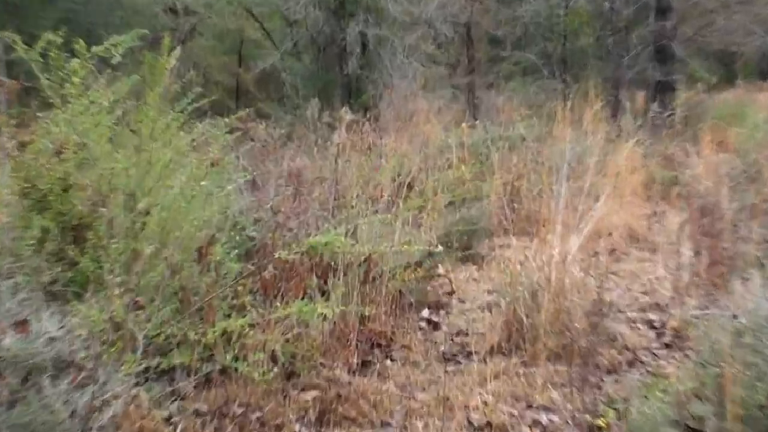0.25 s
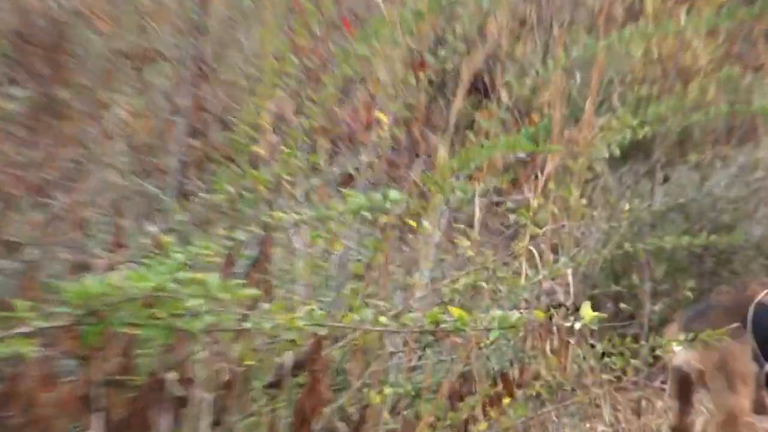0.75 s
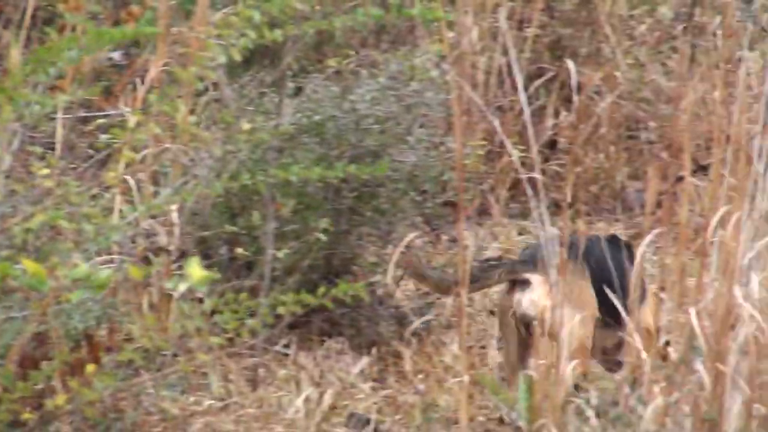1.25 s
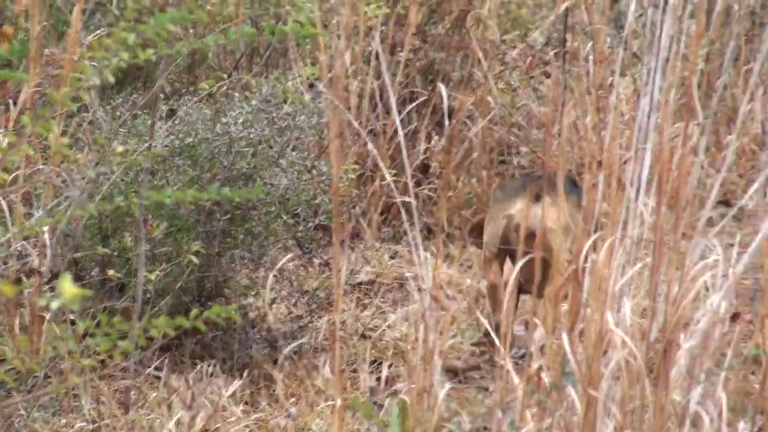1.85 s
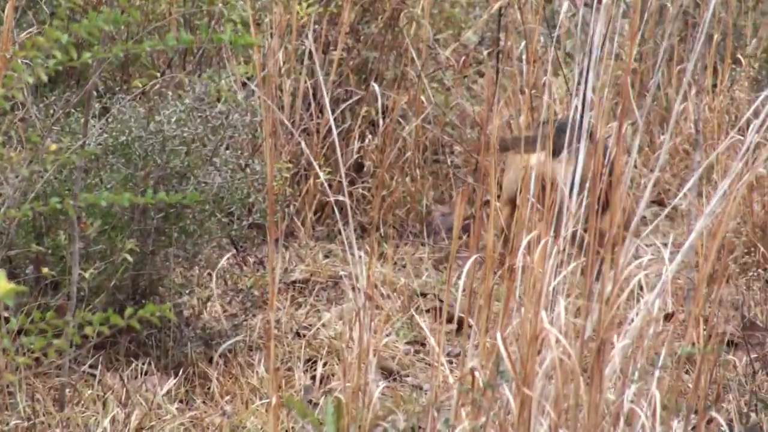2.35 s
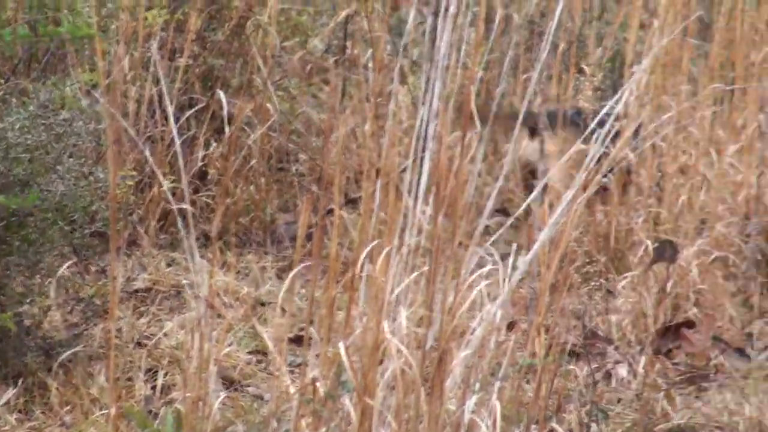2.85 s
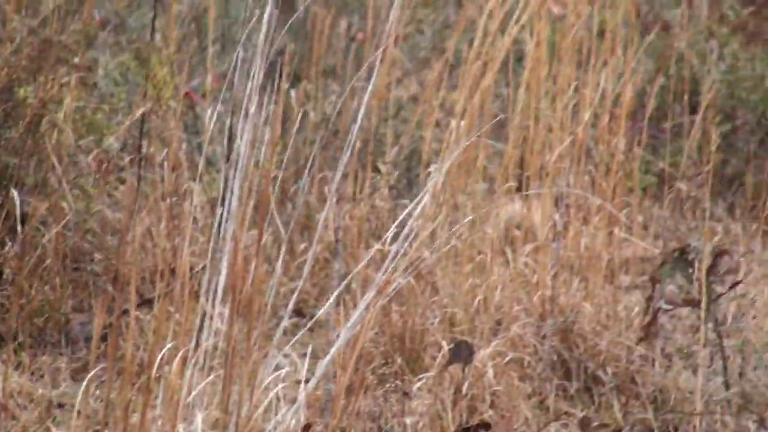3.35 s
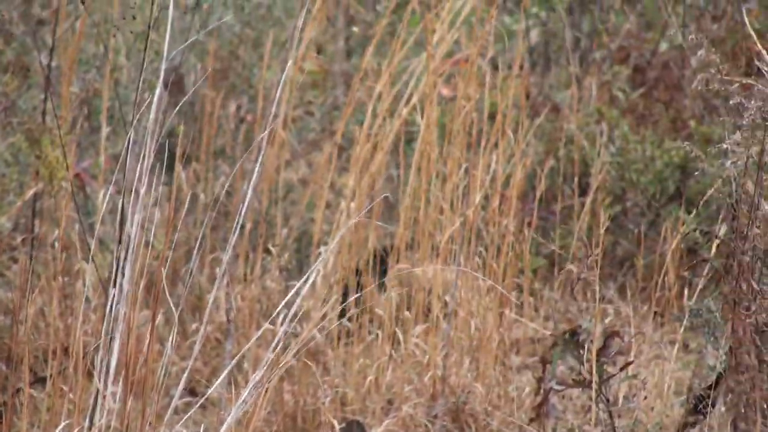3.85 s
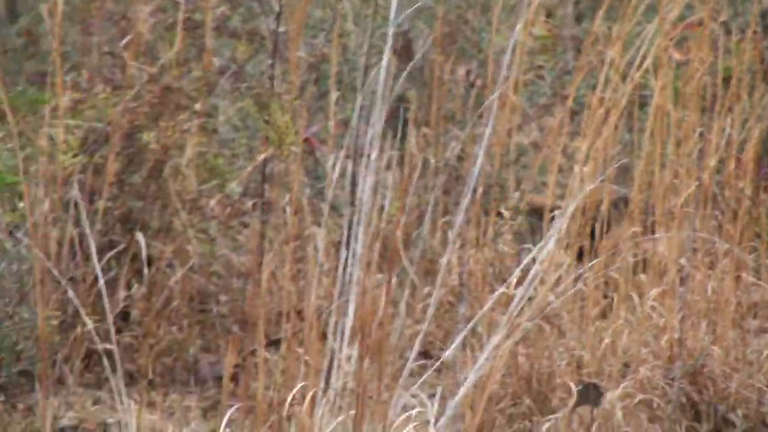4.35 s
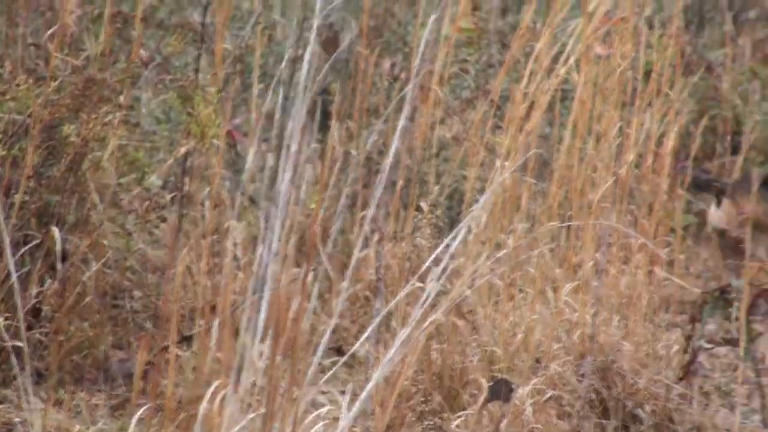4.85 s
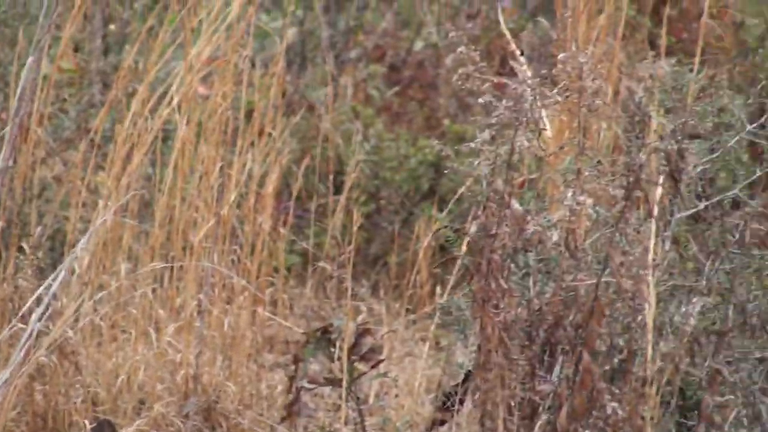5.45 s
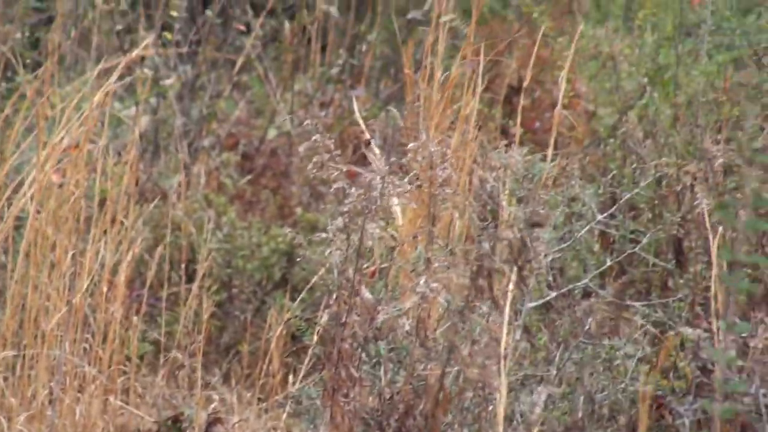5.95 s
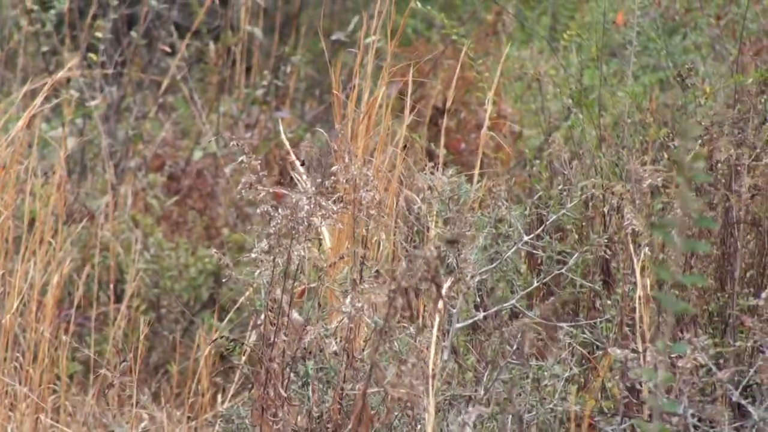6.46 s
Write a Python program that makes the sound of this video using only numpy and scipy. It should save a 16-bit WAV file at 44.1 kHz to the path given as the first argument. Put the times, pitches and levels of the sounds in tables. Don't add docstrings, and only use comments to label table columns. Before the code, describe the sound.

Outdoors in a brushy field by trees, a hound gives thirteen short, high, slightly cracked barks about twice a second, each leaping up in pitch and falling off. Woods echo the calls. A second dog yelps thinly far away, dry stems snap, and low wind rumbles on a handheld camera's stereo microphones over faintly rustling grass. Later barks are quieter as the dog moves away.

```python
import sys
import numpy as np
from scipy import signal
from scipy.fft import rfft, irfft, next_fast_len
from scipy.io import wavfile
from scipy.ndimage import uniform_filter1d

SR = 44100
rng = np.random.default_rng(int(sys.argv[2]) if len(sys.argv) > 2 else 0)


def file_out(sig):
    cols = np.atleast_2d(sig).T
    lim = np.clip(cols, -1, 1)
    pcm = np.round(lim * 32767).astype(np.int16)
    wavfile.write(sys.argv[1], SR, pcm)


def field_ratio(decibels):
    return 10 ** (np.asarray(decibels, dtype=float) / 20)


N = 295022
LEAD = SR // 2

SNAPS = [.834, 1.261, 1.815, 3.252, 3.702, 4.282, 6.275]


def band(x, hz, width):
    b, a = signal.iirpeak(hz, hz / width, fs=SR)
    return signal.lfilter(b, a, signal.lfilter(b, a, x))


def cut(x, hz, kind="low"):
    return signal.sosfilt(signal.cheby2(10, 50, hz, kind, fs=SR, output="sos"), x)


def unit(x):
    return x / np.sqrt(np.mean(x ** 2))


def chance(t, count):
    longest = SR // 4
    return rng.standard_normal((count, longest))[:, :len(t)]


def coloured(points):
    hz, db = np.transpose(points)
    size = next_fast_len(N)
    shape = np.interp(np.log(np.arange(size // 2 + 1) * SR / size + 1), np.log(hz), db)
    return unit(irfft(rfft(rng.standard_normal(size)) * field_ratio(shape), size)[:N])


def walk(rate):
    k = int(SR / rate)
    steps = np.repeat(rng.standard_normal(N // k + 1), k)
    return uniform_filter1d(uniform_filter1d(steps, k), k)[:N]


def add(track, sound, s):
    i = int(s * SR) + LEAD
    n = min(sound.shape[-1], track.shape[-1] - i)
    track[..., i:i + n] += sound[..., :n]


def field():
    # (frequency [Hz], density [dB per Hz])
    leaves = [(120, -58), (200, -15.5), (388, -15.5), (687, -5.5), (767, -12.5), (922, -14), (1170, -15),
              (2040, -22), (2230, -19), (2400, -24.5), (2630, -21), (3170, -27), (16300, -39)]
    level_db = -65
    mid, side = coloured(leaves), coloured(leaves)
    stir = field_ratio(level_db + 8.5 + .5 * walk(4.5) + 0.97 * walk(14))
    return stir * (mid + field_ratio(-4.0) * side * np.array([[1], [-1]]))


def wind(voice):
    # (time [s], level [dB])
    buffets = [(0.0, -44.5), (0.28, -50.5), (0.42, -47), (0.9, -53), (1.21, -59.5), (1.289, -48),
               (1.451, -48), (1.68, -34.5), (1.78, -50), (2.3, -53.5), (2.75, -52), (3.3, -55.5),
               (4.2, -57), (4.8, -52.5), (5.5, -52), (5.85, -76), (6.12, -51), (6.69, -62)]
    # (frequency [Hz], density [dB per Hz])
    rumble = [(8.8, -51.5), (15, -13.5), (37, 5.5), (60, 2.5), (82, 1.5), (157, -6), (289, -20),
              (348, -17.5), (450, -27.5), (580, -70), (990, -120)]
    rumble_lift_db, rumble_release_s = 11.5, 0.083

    late_voice = np.roll(np.abs(voice), int(.018 * SR))
    loud = np.clip(uniform_filter1d(late_voice, int(.03 * SR)) / .022, 0, 1)
    keep = np.exp(-1 / (rumble_release_s * SR))
    linger = np.maximum(loud, 0.94 * signal.lfilter([1 - keep], [1, -keep], loud))
    buffet_db = np.interp(np.arange(N) / SR, *np.transpose(buffets))
    gust = field_ratio(buffet_db + rumble_lift_db * linger + 1.5 * walk(6))
    side_db = -1.5 + 6.2 * loud
    mid, side = (coloured(rumble) * field_ratio(4. * walk(30)) for _ in range(2))
    ports = gust * (mid + field_ratio(side_db) * side * np.array([[1], [-1]]))
    return signal.lfilter(*signal.butter(1, 90, "high", fs=SR), ports)


def woods(x, tail_db, delay, echo_db, t60=1.1):
    t = np.arange(SR) / SR
    mid, side = rng.standard_normal((2, len(t))) * rng.exponential(size=len(t))
    tail = unit(np.exp(-np.log(1000) * t / t60) * np.clip(t / 0.11, 0, 1))
    echo = unit(np.exp(-((t - delay) / 0.0038) ** 2))
    brush = unit(np.exp(-t / 0.078))
    shape = field_ratio(-23) * brush + field_ratio(tail_db) * tail + field_ratio(echo_db) * echo
    shape = shape / np.sqrt(2 * len(t))
    dull = band(x, 720, 500) + field_ratio(-1) * band(x, 1250, 1600)
    return np.array([signal.fftconvolve(dull, shape * (mid + sign * .3 * side)) for sign in (1, -1)])


def far_dog():
    # (time [s], length [s], top pitch [Hz], level [dB], 3rd harmonic [dB])
    yelps = [
        (0.1, 0.11, 597, -55.5, -7.5),
        (0.728, 0.079, 556, -55, 3.5),
        (1.695, 0.047, 539, -54.5, -1),
        (2.039, 0.073, 538.4, -45, -13),
        (3.827, 0.056, 587, -64.5, 4),
    ]
    scoop_from_hz, scoop_under_hz = 489.33, 570
    out = np.zeros((2, N + LEAD))
    for s, length, top_hz, db, third_db in yelps:
        first_hz = scoop_from_hz if top_hz < scoop_under_hz else top_hz
        u = np.linspace(0, 1, int(length * SR))
        hz = top_hz * (1 - 0.082 * u ** 3) + (first_hz - top_hz) * np.exp(-u / 0.26)
        phase = 2 * np.pi * np.cumsum(hz) / SR
        upper = np.sin(3 * phase) + field_ratio(-4.5) * np.sin(4 * phase)
        stack = field_ratio(-3) * np.sin(phase) + np.sin(2 * phase) + field_ratio(third_db) * upper
        hoarse = field_ratio(3 * unit(band(chance(u, count=1)[0], 60, 100)))
        yelp = field_ratio(db) * np.sin(np.pi * u) * stack * hoarse
        add(out, yelp, s)
        add(out, woods(yelp, -11, 0.075, -16.5, t60=0.63), s)
    return out[:, LEAD:]


def twigs():
    # (time [s], snap level [dB], snap pitch [Hz], thud level [dB], thud pitch [Hz])
    stems = [(0.656, -51, 1550, -44, 507), (1.184, -53.5, 3830, -47.5, 700), (2.549, -56, 5200, -28, 307),
             (2.564, -54, 5300, -29, 339.1), (2.6, -59, 5400, -35, 301), (2.899, -57, 3997, -56, 600),
             (3, -60, 3340, -37, 600), (3.791, -55.5, 3741, -48.5, 600), (4.038, -69, 1720, -39.5, 750),
             (4.054, -67, 4130, -64, 700)]
    out, t = np.zeros(N + LEAD), np.arange(2000) / SR
    for s, snap_db, snap_hz, thud_db, thud_hz in stems:
        push = 3 * np.exp(-t / .0004) + np.exp(-t / .006) * rng.standard_normal(len(t))
        knock = band(push, thud_hz, 450) + field_ratio(-2) * band(push, 2.6 * thud_hz, 400)
        knock += field_ratio(-9) * band(push, 1720, 300) + field_ratio(-15) * band(push, 2600, 400)
        tick = band(rng.standard_normal(len(t)) * np.exp(-t / .005), snap_hz, 400)
        snap = field_ratio(snap_db) * tick / np.abs(tick).max()
        thud = field_ratio(thud_db + 1.5) * knock / np.abs(knock).max()
        add(out, snap + thud, s)
    return out[LEAD:]


def snapped(t, s):
    out = t.copy()
    for snap in SNAPS:
        if s[0] < snap < s[-1]:
            j = np.searchsorted(s, snap)
            inside = (t > s[j - 1]) & (t < s[j])
            lagging = s[j - 1] + 0.34 * (t - s[j - 1])
            out[inside] = np.where(t < snap, lagging, s[j])[inside]
    return uniform_filter1d(out, size=220)


def gesture(call, effort, throat):
    attack_s, crest_s, settle_s, last_hz = .005, .006, .015, 444.6
    start, rise, hold, peak_db, top_hz = call
    glide_db, settled_db, sag_db, gasp_db, fall_s = effort
    first_hz, lock_hz, pure_db, late_db, third_db = throat
    lock, fall = start + rise, start + rise + hold
    climb_hz, drop_hz = top_hz - lock_hz, top_hz - last_hz
    snaps = any(start < snap < lock for snap in SNAPS)
    climb, brass_db = (.25, -4) if snaps else (.45, .6 * pure_db)
    glide_hz = first_hz + climb * (lock_hz - first_hz)
    rows = [
        (start, first_hz, -34, -3, -14),
        (start + attack_s, first_hz, glide_db - 10.5, 0, -13),
        (start + .6 * rise, glide_hz, glide_db, brass_db, brass_db - 11.5),
        (lock - .002, lock_hz, 0, pure_db, pure_db - 17.5),
        (lock + crest_s, lock_hz + 0.28 * climb_hz, -.5, pure_db, pure_db - 18),
        (lock + settle_s, lock_hz + 0.37 * climb_hz, settled_db, .7 * pure_db + 0.14 * late_db, third_db - 3.5),
        (lock + .6 * hold, top_hz, .55 * settled_db + 0.5 * sag_db, late_db - 4.5, third_db),
        (fall, top_hz - 6, sag_db, late_db, third_db + 2.0),
        (fall + .48 * fall_s, top_hz - .28 * drop_hz, gasp_db, -17, -39),
        (fall + .78 * fall_s, top_hz - 0.73 * drop_hz, gasp_db - 2.5, -17, -38),
        (fall + fall_s, last_hz, gasp_db - 11, -13, -30)]
    return np.array(rows) + [0, 0, peak_db, 0, 0]


def breath(t, noise):
    # (frequency [Hz], width [Hz], level [dB])
    cavities = [(2420, 560, 2.5), (6460, 760, -6.5), (6800, 250, -13), (7800, 1600, -7),
                (10900, 4600, -9.5)]
    patches = field_ratio(3.2 * unit(band(chance(t, count=len(cavities)), 6, 10)))
    return sum(field_ratio(db) * patch * unit(band(noise, hz, width)) for (hz, width, db), patch in zip(cavities, patches))


def second_mode(t, hz, phase, noise, chaos):
    # (time [s], length [s], first pitch [Hz], level under the voice [dB], roughness [0-1])
    onsets = [(0.311, 0.046, 870.9, -11.5, 1.06), (0.349, 0.04, 1000, -11.5, 0),
              (0.417, 0.034, 1012, -9.5, 0.42), (0.855, 0.032, 1035, -13.5, 0),
              (0.867, 0.019, 965.5, -14.5, 0.8), (0.936, 0.024, 992, -6, 0.4),
              (1.257, 0.0093, 924, -11.5, 0.7), (1.293, 0.044, 962, -16, 0), (1.364, 0.025, 1020, -11, 0.7),
              (1.906, 0.011, 847, -4.5, 0.13), (2.37, 0.091, 886, -1, 0.28), (2.443, 0.027, 1010, -3, 0.22),
              (2.814, 0.029, 1021, -8.5, 0), (2.833, 0.032, 950, -6.5, 0.7),
              (3.278, 0.097, 945, -3.5, 0.48), (3.698, 0.019, 950, -19, 0.82),
              (3.721, 0.089, 920, -15, 0.2), (4.302, 0.042, 1032, -17.5, 0.17),
              (4.363, 0.02, 890, -13.5, 0.38), (4.903, 0.024, 1024, -6, 0.64),
              (5.261, 0.06, 1020, -16.5, 0.08), (5.28, 0.044, 887.7, -10.5, 0.63),
              (5.347, 0.02, 960, -13.5, 0.26), (5.878, 0.031, 873, -3.5, 0.5)]
    sag_hz_per_s, follows = 390, 1.5
    shake, mode = np.zeros((2, len(t)))
    begin, end = t[0], t[-1] + 1 / SR
    for start, length, first_hz, mode_db, rough in onsets:
        if not begin < start < end:
            continue
        u = np.clip((t - start) / length, 0, 1)
        swell = field_ratio(mode_db) * np.sin(np.pi * u) ** .7
        drop = np.minimum(hz / np.interp(start, t, hz), 1) ** follows
        mode_phase = 2 * np.pi * np.cumsum((first_hz - sag_hz_per_s * length * u) * drop) / SR
        rasp = unit(cut(band(noise, first_hz, 600), 2000))
        mode += swell * ((1 - rough) * np.sin(mode_phase) + rough * rasp)
        mode += swell * field_ratio(-31.5) * np.sin(mode_phase + phase)
        beat = .25 * np.sin(mode_phase - phase)
        jolts = 2.2 * np.tanh(unit(band(chaos, 75, 90)))
        shake += swell * ((1 - rough) * beat + rough * jolts)
    return shake, mode


def bark(rows, hiss_db):
    mouth_top_hz = 3090
    s, *columns = np.transpose(rows)
    t = np.arange(s[0], s[-1], 1 / SR)
    hz, _, second_db, third_db = (np.interp(snapped(t, s), s, c) for c in columns)
    db = np.interp(t, s, columns[1])
    noise = chance(t, count=4)
    jitter = 1 + .007 * unit(band(noise[0], 90, 200))
    phase = 2 * np.pi * np.cumsum(hz * jitter) / SR
    shake, mode = second_mode(t, hz, phase, noise[1], noise[2])

    voice = np.sin(phase) + field_ratio(second_db) * np.sin(2 * phase + 0.9)
    for k in range(3, 7):
        flutter = 1 + .45 * unit(band(chance(t, count=1)[0], 50, 90))
        harmonic_db = third_db * (1 + .2 * (k - 3)) - 7 * np.sqrt(k - 3)
        voice += field_ratio(harmonic_db) * flutter * np.sin(k * phase + 1.2 * k)
    voice += field_ratio(-30) * unit(cut(band(noise[0], 1150, 900), 2200))
    voice = cut(voice * (1 + shake) + mode, 389, "high")
    tone = cut(np.sqrt(2) * field_ratio(db) * voice, 1.25 * mouth_top_hz)

    hiss = field_ratio(hiss_db + 0.35 * db + 0.56 * db.max()) * breath(t, noise[3])
    edge = np.clip(np.minimum((t - s[0]) / 0.0014, (s[-1] - t) / 0.0045), 0, 1)
    return edge * (tone + hiss)


def hound():
    # (time [s], rise [s], hold [s], peak level [dB], top pitch [Hz])
    calls = [(0.289, .046, 0.076, -16, 662.5), (0.804, .036, .082, -14, 698.5),
             (1.237, .033, .088, -13.5, 708.2), (1.793, .029, 0.083, -12, 711),
             (2.32, .017, 0.11, -13, 677), (2.743, .027, .110, -17.5, 710.6),
             (3.225, .036, 0.085, -17, 673), (3.67, .039, 0.093, -18, 691), (4.253, .034, .096, -16, 676.7),
             (4.819, .023, 0.093, -25.5, 730.5), (5.209, .038, 0.087, -22, 697.8),
             (5.771, .022, 0.088, -26, 704.8), (6.255, .027, 0.083, -22.5, 724.4)]
    # (glide [dB], settled [dB], end of hold [dB], last gasp [dB], fall [s])
    efforts = [(-5.5, -1, -7, -4.5, .042), (-9.5, -4, -8, -14, .052), (-10.5, -3.5, -9.5, -10.5, 0.039),
               (-12, -4.5, -13, -13.5, 0.037), (-9.5, -3.5, -17, -18.5, .040), (-8.5, -2, -7.5, -6.5, .036),
               (-10.5, -4, -13, -11, 0.038), (-8, 0.5, -7.5, -7, 0.035), (-15, -5.5, -10.5, -9, 0.044),
               (-2, 0.5, -2.5, -8, 0.048), (-4, -2, -5.5, -5.5, 0.045), (-4.5, -3.5, -13, -19, 0.058),
               (-12, -3.5, -13, -13, .048)]
    # (first pitch [Hz], locked pitch [Hz], overtones at the lock [dB],
    # 2nd harmonic late in the hold [dB], 3rd harmonic in the hold [dB])
    throats = [(512, 660, -25.5, -5, -38), (547, 685, -22, -11, -52), (543.6, 675, -23.5, -6.5, -38),
               (552.3, 683, -20, -5, -34.5), (592.4, 638, -29, -9.5, -40.5), (516, 645, -18.5, -11, -36.5),
               (528, 672, -21, -12, -44), (551, 662, -26.5, -12.5, -46.5),
               (522.7, 696, -26.5, -16.5, -46.5), (570, 655, -11.5, -4, -26),
               (552.4, 690, -20, -15.5, -47.5), (582, 645, -37.5, 0.5, -24), (569.4, 685, -33, -14.5, -32)]
    # (breath hiss [dB], woods tail [dB], echo delay [s], echo level [dB])
    surroundings = [(-47.5, -31.5, 0.049, -46), (-49, -30.5, .2, -29), (-50, -28, 0.17, -55),
                    (-56.5, -33.5, 0.2076, -31.5), (-48.5, -29.5, 0.29, -37.5), (-49.5, -25, 0.198, -28.5),
                    (-49, -23, .2, -44), (-52, -23, 0.19, -32), (-49.5, -18, .135, -25),
                    (-49.5, -20, .2, -51), (-49.5, -18, 0.19, -33), (-46.5, -14.5, 0.14, -56.5),
                    (-54, -21, 0.24, -38)]
    dry, wet = np.zeros(N + LEAD), np.zeros((2, N + LEAD))
    for call, effort, throat, (hiss_db, *trees) in zip(calls, efforts, throats, surroundings):
        sound = bark(gesture(call, effort, throat), hiss_db)
        add(dry, sound, call[0])
        add(wet, woods(sound, *trees), call[0])
    earlier = bark(gesture(calls[1], efforts[1], throats[1]), -51)
    add(wet, woods(earlier, -28, 0.2976, -33), -.24)
    return dry[LEAD:], wet[:, LEAD:]


def scene():
    dry, wet = hound()
    pan = field_ratio(np.array([[.4], [-.4]]))
    lead = field_ratio(-20.5) * signal.hilbert(dry, next_fast_len(N))[:N].imag
    near = pan * (dry + twigs()) + lead * np.array([[1], [-1]])
    return near + wet + far_dog() + wind(dry) + field()


def low_pass(x):
    return signal.sosfilt(signal.butter(12, 16460, fs=SR, output="sos"), x)


def record(dry):
    side = cut((dry[0] - dry[1]) / 2, 11390)
    mid = cut((dry[0] + dry[1]) / 2, 16900)
    return low_pass(np.array([mid + side, mid - side]))


dry = scene()
out = record(dry)
file_out(out)
```